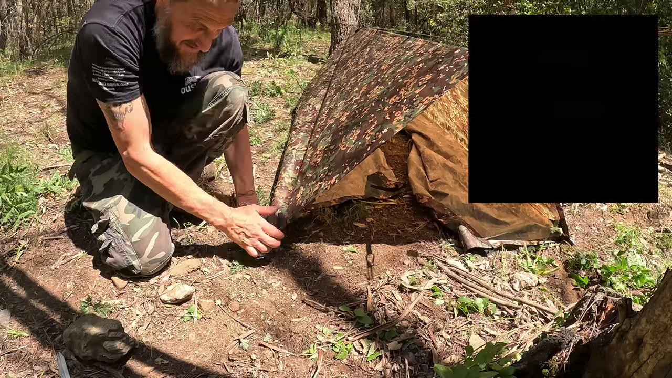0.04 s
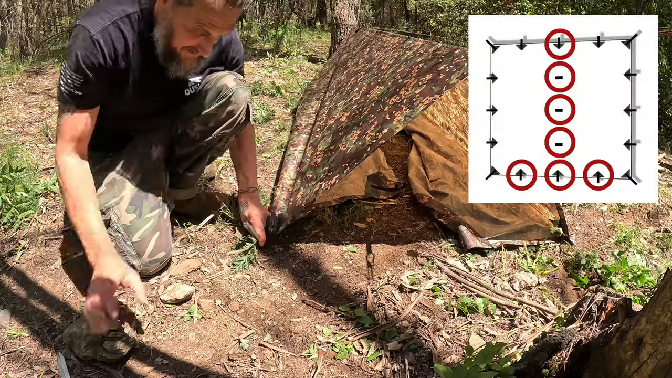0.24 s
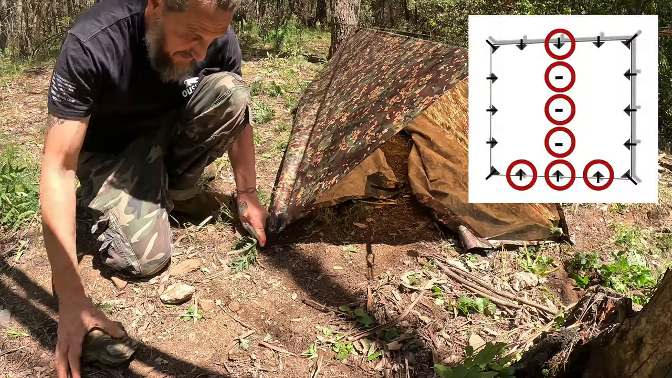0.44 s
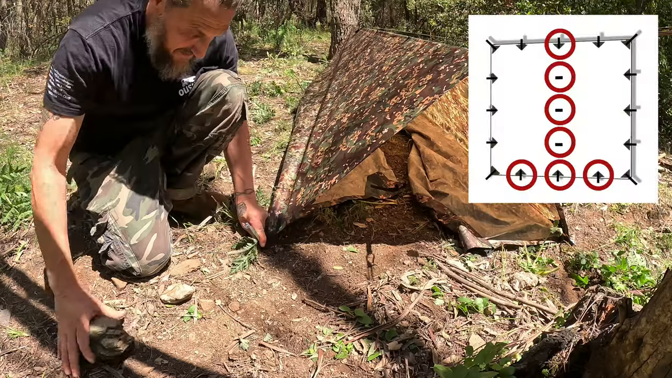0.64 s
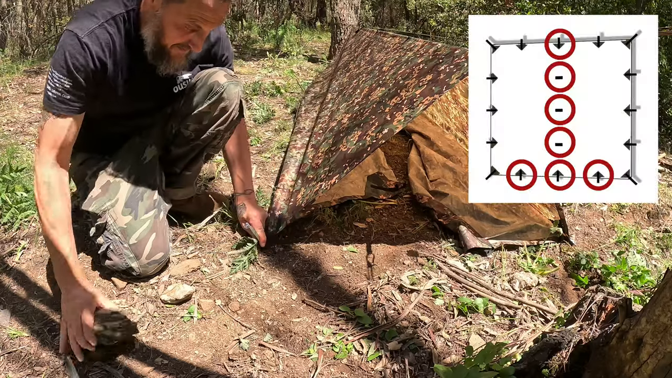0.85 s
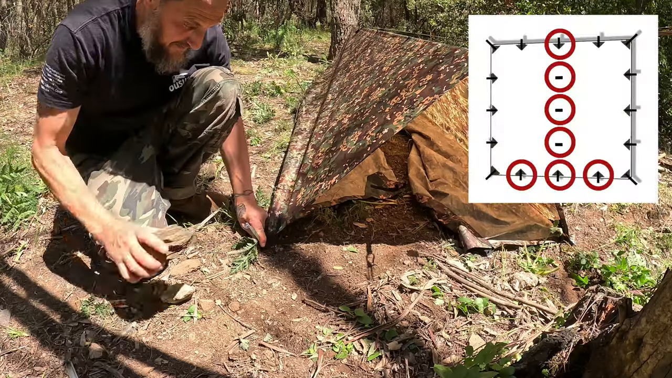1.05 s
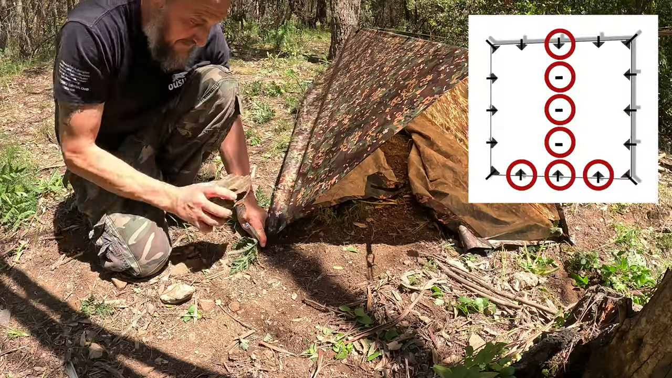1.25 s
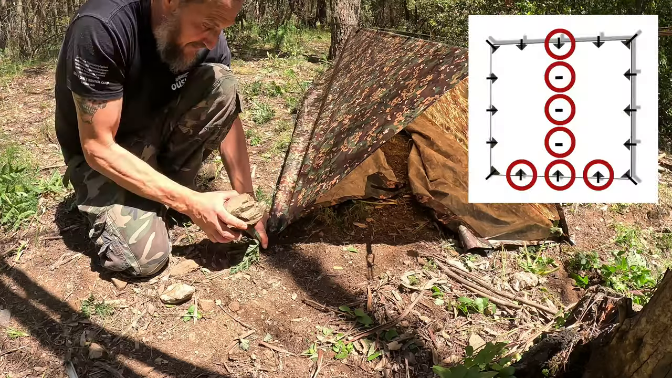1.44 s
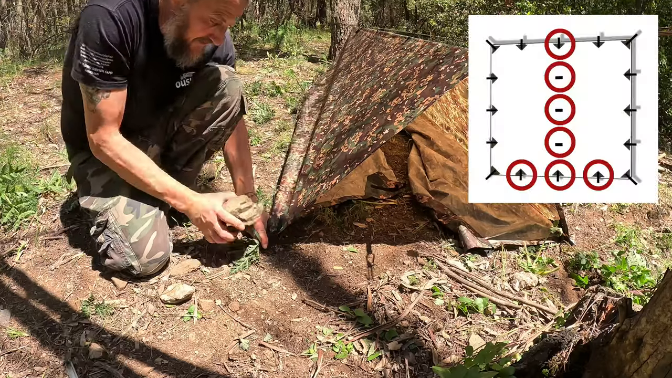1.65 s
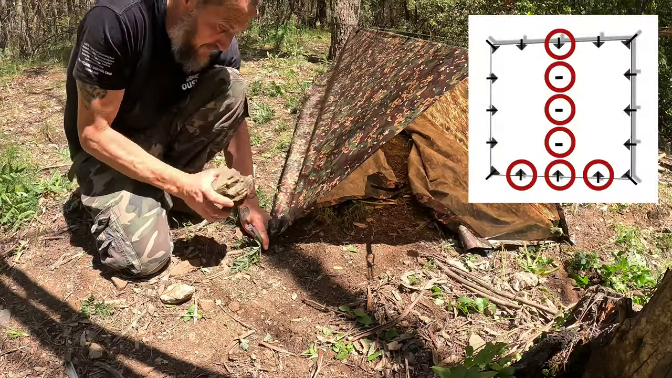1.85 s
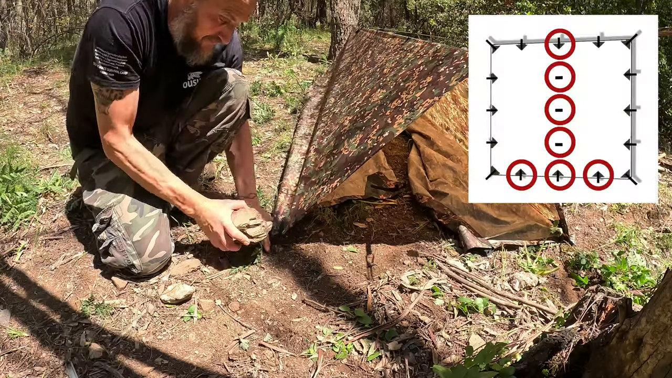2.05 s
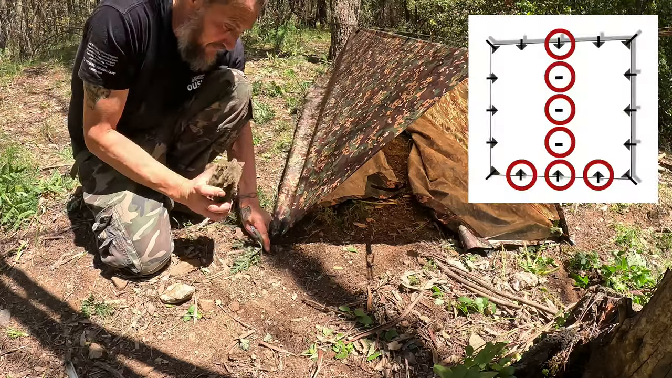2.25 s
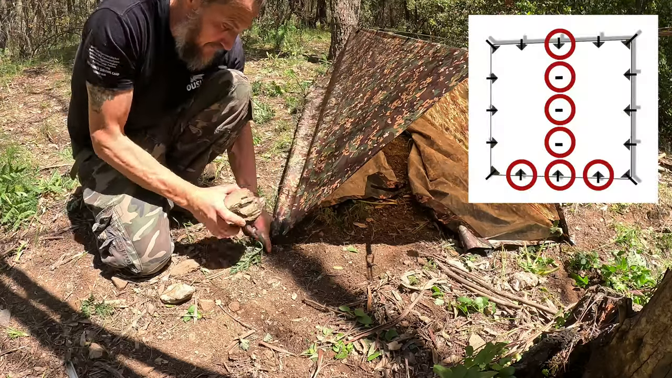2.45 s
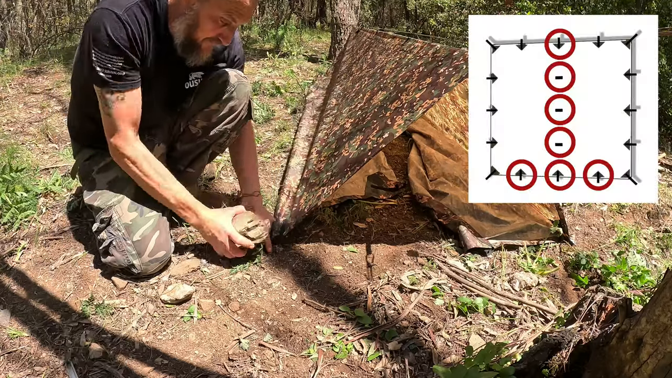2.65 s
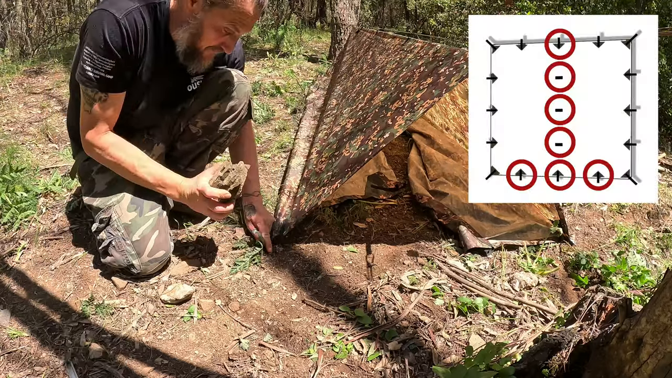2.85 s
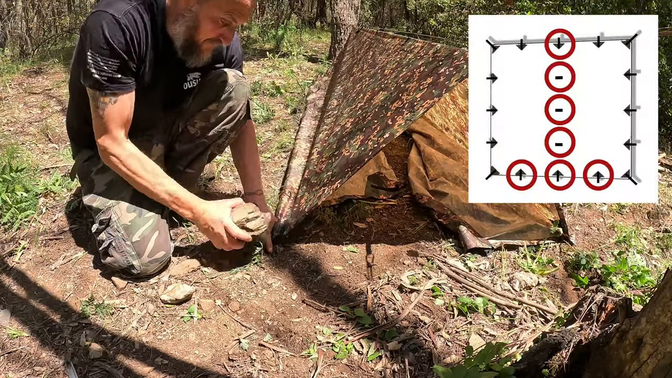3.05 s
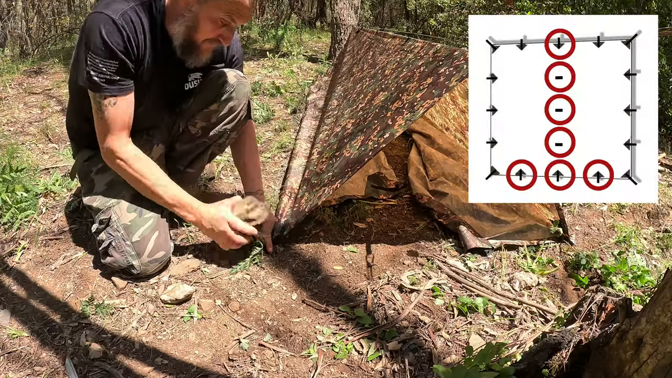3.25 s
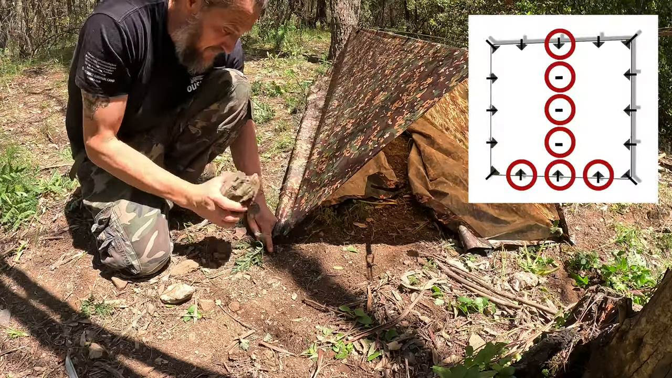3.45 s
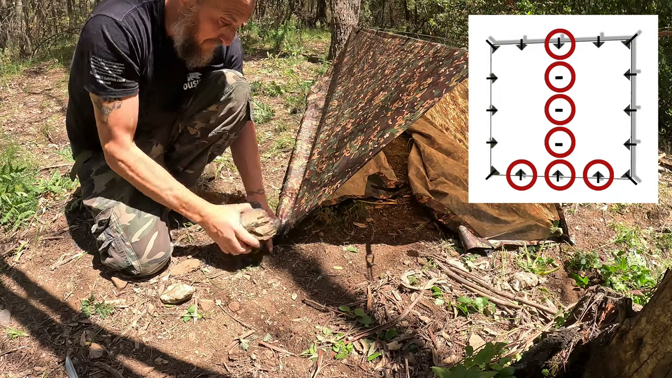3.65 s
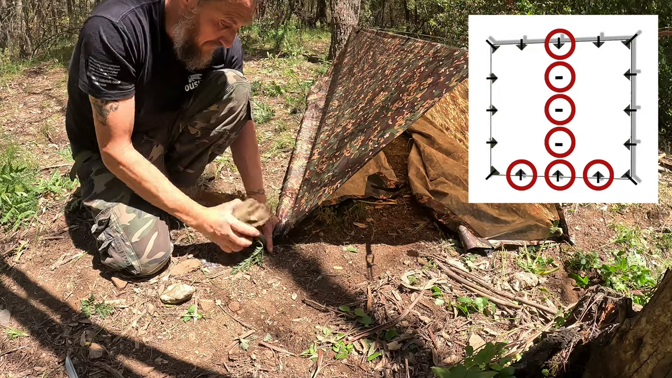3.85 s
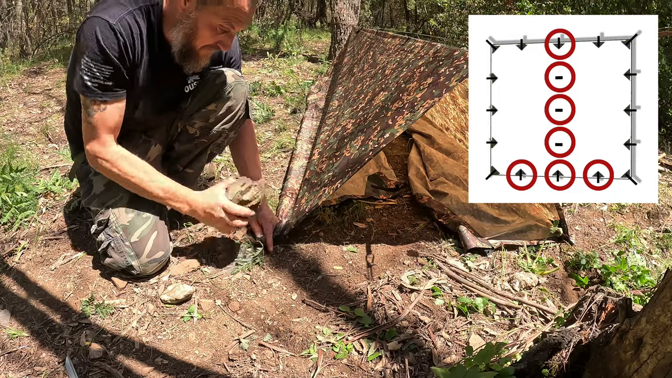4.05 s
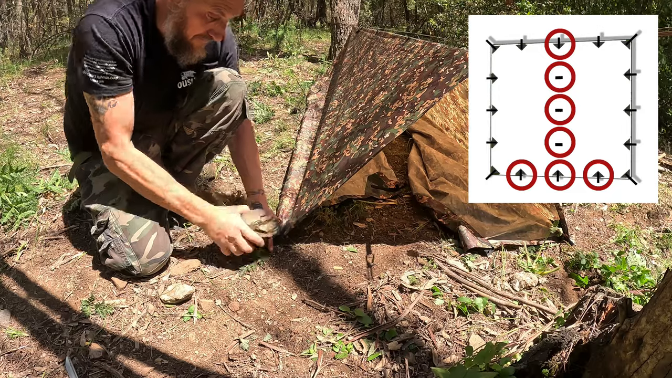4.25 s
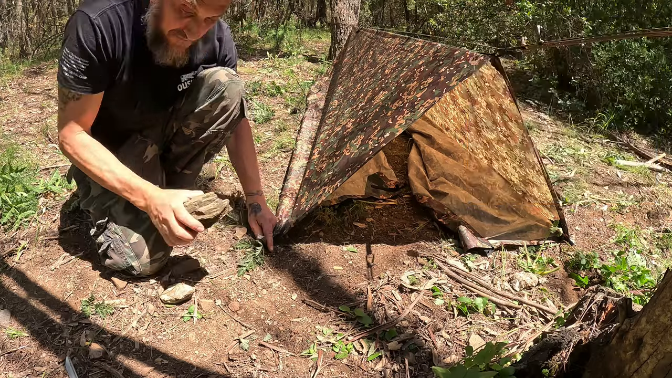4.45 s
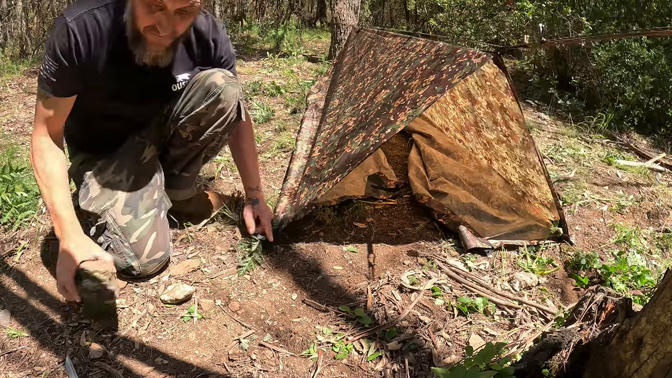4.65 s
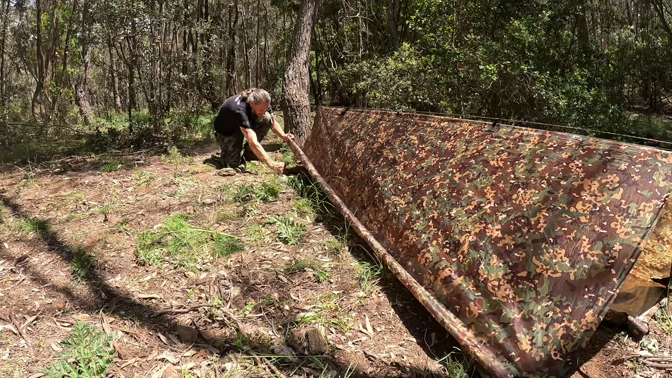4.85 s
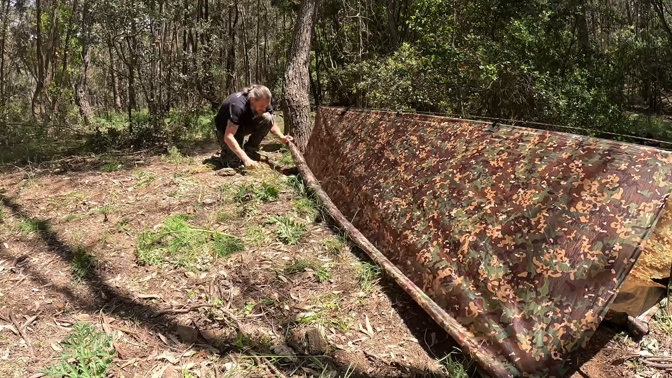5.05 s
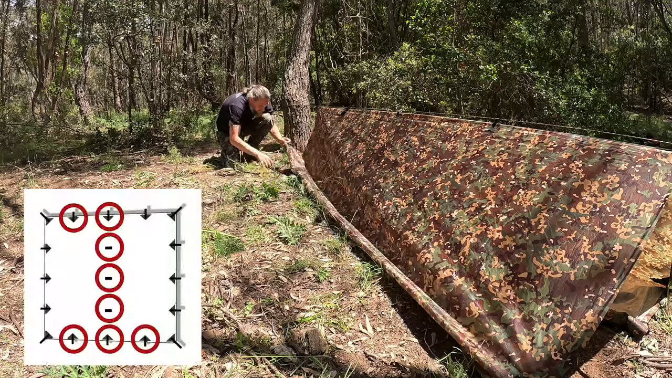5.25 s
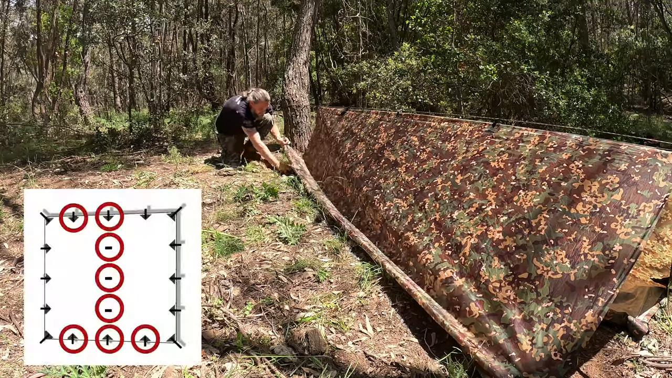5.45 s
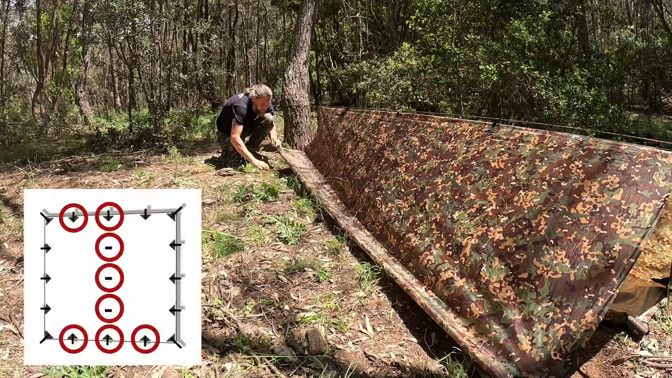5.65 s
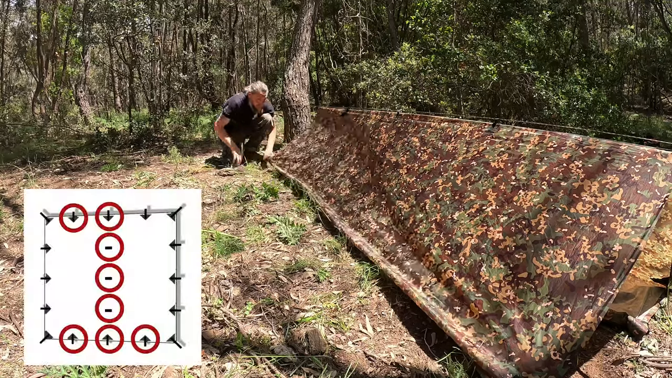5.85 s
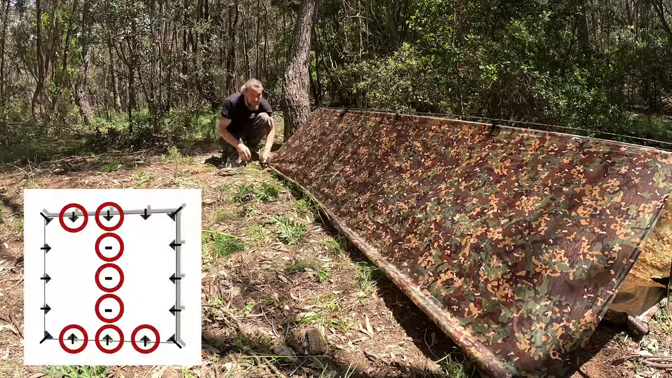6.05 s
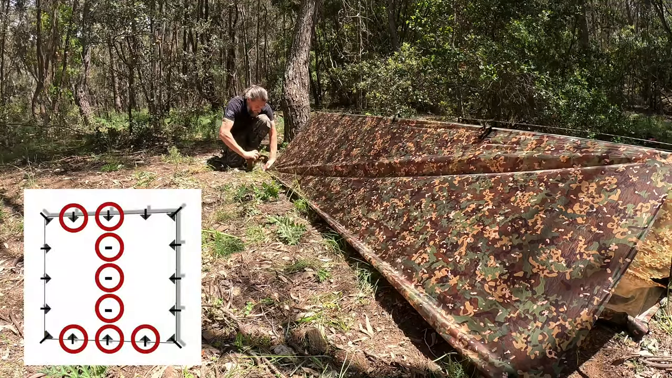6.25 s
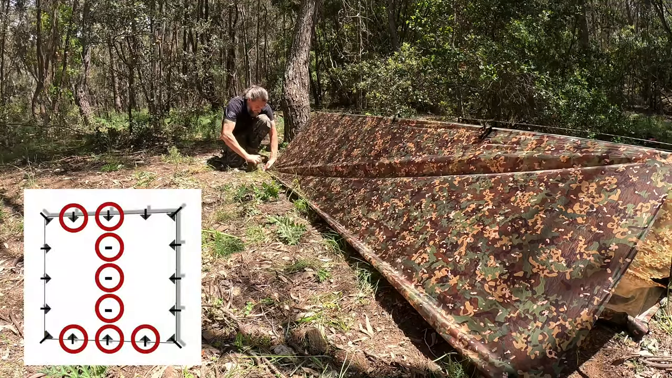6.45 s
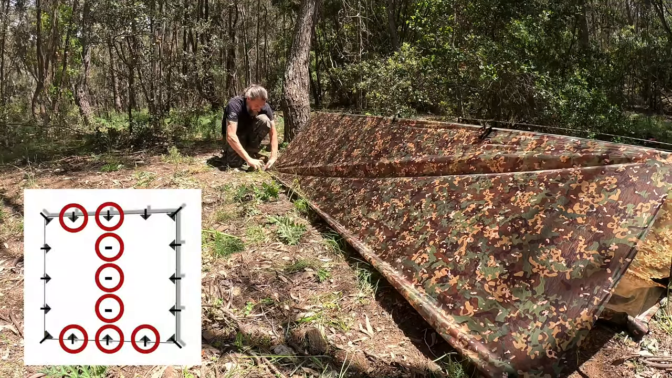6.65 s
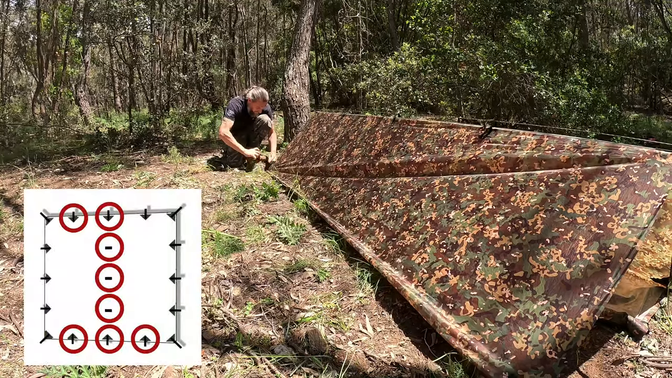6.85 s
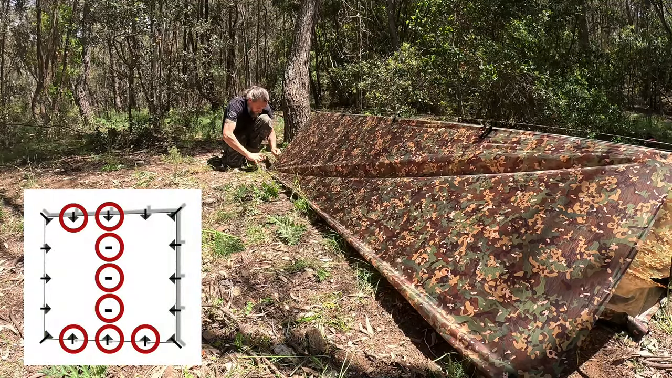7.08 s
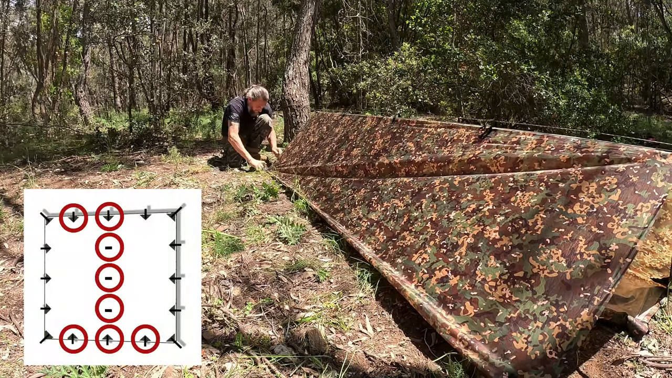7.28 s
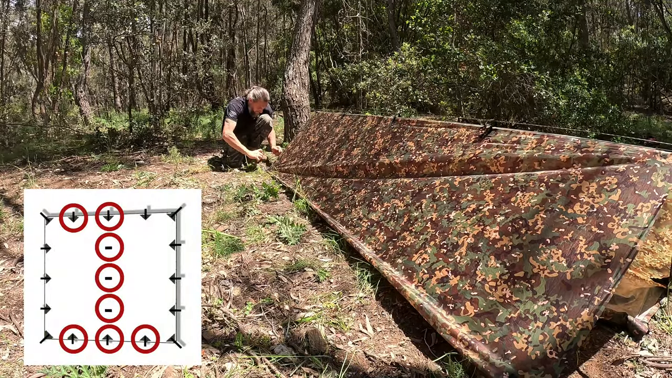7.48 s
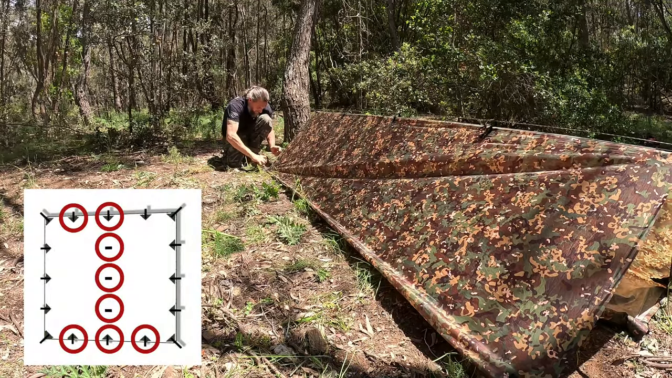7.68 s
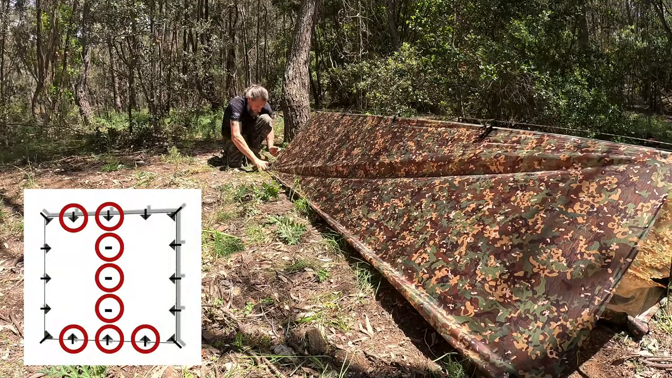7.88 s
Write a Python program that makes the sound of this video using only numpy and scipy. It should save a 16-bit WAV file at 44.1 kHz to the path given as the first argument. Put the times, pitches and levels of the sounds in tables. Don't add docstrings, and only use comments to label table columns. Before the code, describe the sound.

Outdoor mono pickup near the ground: a short bright jingle of metal pegs, a two-note bird song, then evenly spaced stone-on-stake knocks, loud and dry with deep thuds and small rebounds. The hammering stops; fabric and litter rustle and tick faintly while thin bird whistles sound. Then distant, smaller taps resume at the same pace, with woody echo, dull thumps and slight metallic ringing.

```python
import sys
import numpy as np
from scipy import signal
from scipy.io import wavfile

SR = 44100
rng = np.random.default_rng(int(sys.argv[2]) if len(sys.argv) > 2 else 0)


def elevation(decibels):
    levels = np.asarray(decibels, float)
    return 10 ** (levels / 20)


def int16_out(signal):
    q = np.round(np.clip(np.atleast_2d(signal).T, -1, 1) * 32767)
    wavfile.write(sys.argv[1], SR, q.astype(np.int16))


N = 349272

# start_s, crack_peak_db, lower_knock_hz, upper_knock_hz, thump_db
NEAR_BLOWS = [
    (1.355, -23.5, 1260, 2340, -24),
    (1.68, -11, 1820, 2138, -20),
    (2.006, -2.5, 2100, 2360, -21),
    (2.34, -4, 1920, 2215, -17.5),
    (2.66, -4.5, 2090, 2393, -15),
    (2.976, -11, 1860, 2666, -14),
    (3.287, -6.5, 2050, 2600, -15),
    (3.588, -8, 1940, 2740, -14),
    (3.888, -8, 1924, 2120, -13),
    (4.188, -7, 1953, 2244, -15.5),
]
# start_s, crack_peak_db, knock_hz, thump_db, grind_s
FAR_BLOWS = [
    (6.337, -29, 3380, -31.5, 0.0045),
    (6.6457, -34.5, 3580, -30, 0.00056),
    (6.9648, -27.5, 3340, -31.5, 0.00022),
    (7.2774, -20.5, 3520, -28.5, 0.0016),
    (7.58, -23.5, 3490, -27.5, 0.0009),
    (7.8556, -28, 3380, -24.5, 0.0018),
]
# start_s, peak_db, knock_hz
GRAZES = [
    (6.6481, -34, 6200),
    (6.966, -28, 2720),
    (7.2755, -40, 3340),
    (7.579, -38.5, 3540),
]
# pitch_hz, level_db, t60_s
ROCK_MODES = [(676, -13, 0.0068), (924, -7.5, 0.0079), (1463, -6.5, 0.0075), (3800, -9.5, 0.0076),
              (4550, -8.5, 0.0047), (5402, -5, 0.0043), (6200, -14.5, 0.0057), (7480, -10, 0.0037),
              (9000, -13.5, 0.0036), (11500, -19, 0.0033), (14660, -25.5, 0.0036)]
# pitch_hz, level_db, t60_s, arrival_s, polarity
SOIL_WAVES = [(273, 0.5, .035, 0.00361, -0.83), (93, 2, 0.07, 0.00488, 0.66), (74, -21, .16, .01, 1),
              (175, -8, 0.093, .008, 0.83)]
# start_s, level_db
REBOUNDS = [(1.379, -36), (1.7, -35), (1.706, -31.5), (2.036, -25), (2.045, -38), (2.382, -30),
            (2.693, -25), (3.006, -38), (3.017, -33), (3.327, -28), (3.623, -20), (3.922, -23.5),
            (4.203, -28.5), (4.212, -29), (7.005, -44.5), (7.016, -40), (7.325, -37), (7.593, -34),
            (7.868, -41), (7.895, -36.5)]
# start_s, pitch_hz, level_db, t60_s
STAKE_RING = [
    (6.648, 6250, -42, 0.051),
    (6.968, 6230, -52.5, 0.23),
    (7.279, 6290, -48.5, 0.18),
    (7.858, 6250, -55, 0.17),
    (7.858, 3854, -45, 0.095),
]
# start_s, tick_db, ring_db, best_excited_hz
JINGLE_TOUCHES = [(.378, -52, -58, 10500), (.385, -44, -48, 10700), (0.397, -21, -43.5, 4860),
                  (.4, -29, -43, 6000), (.417, -42, -49, 11500), (.422, -44, -44, 8400),
                  (.433, -46, -52, 5500), (.445, -41, -52, 5000), (0.4835, -22, -50, 5000),
                  (0.4879, -25, -35.5, 4970), (0.491, -24.5, -35.5, 8000), (.496, -44, -38, 11000),
                  (0.5209, -29, -41.5, 6080), (0.5423, -39, -54, 7000), (.548, -21, -36, 5900),
                  (0.5518, -37, -38, 5100), (.598, -43.5, -64, 11000), (0.64, -49, -57, 11000),
                  (0.68, -40, -61, 6000), (.691, -43, -64, 8000), (.708, -50, -64.5, 9000),
                  (0.734, -37, -57.5, 6000), (.747, -53, -50.5, 8500), (.772, -56, -61, 6000),
                  (1.008, -54, -74, 9000)]
# pitch_hz, level_db, t60_s
STAKE_MODES = [(2900, -32, 0.12), (3800, 0, 0.067), (4196, -11.5, 0.091), (4780, -11, 0.0426),
               (5700, -11, 0.08), (5930, 5.5, 0.036), (6250, -25, 0.053), (6800, -15, 0.088),
               (7420, -15, 0.12), (8100, -27, 0.052), (8400, -11, 0.1), (9800, -14, 0.1),
               (9870, -11.5, 0.12), (10600, -14, 0.068), (11000, -7, .08), (11800, -26, 0.039),
               (12700, -3, 0.066), (14060, -16, 0.049), (14630, -10, 0.065)]
# peak_s, level_db, swell_s, fade_s
RUSTLE_PULLS = [(.398, -48, 0.016, 0.064), (.482, -51, .02, 0.02), (.688, -57.5, 0.21, 0.03),
                (.746, -58, .03, 0.044), (4.72, -63.5, 0.026, 0.074), (4.87, -66, 0.038, .06),
                (5.0, -70, 0.11, 0.16), (5.13, -61, 0.18, 0.067), (5.2, -74, .03, 0.054),
                (5.33, -77, 0.056, .15), (5.54, -67.5, 0.11, 0.27), (5.65, -72, 0.18, 0.034),
                (5.79, -58.5, 0.094, 0.13), (5.89, -71, .15, 0.019), (6.02, -68.5, 0.1, .2),
                (6.1, -72, 0.106, 0.025), (6.222, -79, 0.17, .006), (6.8, -70.5, 0.32, .16)]
# freq_hz, density_db_per_hz
FABRIC_SPECTRUM = [(880, -40), (1500, -1), (2010, -9.5), (3060, -1), (3520, 2), (7620, -4.5), (12600, 0.5),
                   (15700, -6), (16500, -10)]
# start_s, peak_db
LITTER_SNAPS = [(3.669, -40.5), (4.7544, -46.5), (4.7894, -51), (4.8297, -48), (4.8504, -47), (4.8606, -45),
                (4.8973, -43), (5.1424, -49.5), (5.2044, -56), (5.5024, -50), (5.9044, -52), (6.0075, -45),
                (6.0454, -44.5), (6.11, -44), (6.1429, -55.5), (6.2194, -50)]
# start_s, peak_db
TARP_SNAPS = [(5.0844, -44), (5.1264, -45), (5.5268, -48.5), (5.7144, -52.5), (5.7694, -46), (5.8795, -44),
              (5.9594, -45.5), (5.9774, -50), (5.9892, -43.5), (5.9974, -43), (6.0152, -41), (6.0711, -54)]
# start_s, high_hz, high_db, low_hz, low_db
SONG = [
    (0.889, 4740, -63, 3800, -58),
    (1.39, 4700, -56.5, 3590, -56),
    (1.88, 4650, -53, 3800, -55.5),
]
# start_s, length_s, pitch_hz, level_db
SEEPS = [
    (5.098, 0.19, 7020, -68.5),
    (5.271, 0.26, 6860, -68.5),
    (5.53, 0.162, 6800, -69.5),
    (6.9, .075, 7100, -74.5),
    (7.05, .063, 6850, -71),
    (7.2, 0.068, 6850, -72.5),
]
# start_s, length_s, first_hz, last_hz, level_db
WARBLES = [
    (1.055, 0.13, 2980, 2900, -69),
    (1.866, .065, 3680, 3650, -68),
    (5.278, 0.074, 2600, 2820, -64.5),
    (5.33, 0.0687, 2860, 2500, -70),
    (5.49, 0.077, 3750, 3800, -66.5),
    (6.059, .06, 2468, 2862, -63.5),
    (6.15, 0.04, 3562, 3410, -68),
    (6.51, .03, 7500, 7200, -74),
]
# freq_hz, level_db, early_t60_s, late_db, late_t60_s
TRUNK_ECHOES = [(402, -39.5, 0.1, -15.5, .5), (780, -44, 0.086, -21.5, .6), (1520, -45.5, 0.067, -26, 0.81),
                (2600, -50, 0.04, -13.5, 0.45), (4537, -41, 0.049, -13, 0.3),
                (8000, -40.5, 0.089, -18, 0.54), (13300, -34, .05, -17, 0.24)]
# time_s, wind_db, forest_air_db
AIR_LEVELS = [(0.0, -51, -65.5), (1.3, -60, -64.5), (1.899, -52, -64.5), (2.9, -64.5, -64),
              (4.2, -61.5, -66), (4.6, -53.5, -61), (4.85, -75, -67), (6.2, -66, -66), (6.26, -61, -69.5),
              (7.28, -73, -70), (7.92, -67, -69)]
# freq_hz, density_db_per_hz
WOODS_SPECTRUM = [(35, -31.5), (60, -4), (108, -8), (264, -18.5), (366, -16.5), (464, -16), (815, -12.5),
                  (1190, -22.5), (1300, -21.5), (4750, -29.5), (7420, -31.5), (15400, -38.5), (16500, -57)]


def rms_one(x):
    return x / np.sqrt(np.mean(x ** 2) + 1e-20)


def band(x, low_hz, high_hz):
    edges_hz = [low_hz, min(high_hz, 0.45 * SR)]
    return signal.sosfilt(signal.butter(2, edges_hz, "band", fs=SR, output="sos"), x)


def drift(rate_hz, size=N):
    r = np.exp(-2 * np.pi * rate_hz * 8 / SR)
    noise = rng.standard_normal(size // 8 + 4002)
    slow = signal.lfilter([1], [1, -2 * r, r * r], noise)[4000:]
    return np.interp(np.arange(size) / 8, np.arange(len(slow)), rms_one(slow))


def add(out, start_s, sound):
    i = round(start_s * SR)
    out[i:i + len(sound)] += sound[:N - i]


def mode(pitch_hz, t60_s):
    t = np.arange(int(t60_s * SR) + 2) / SR
    return np.sin(2 * np.pi * pitch_hz * t) * elevation(-60 * t / t60_s)


def soften(x, corner_hz):
    r = np.exp(-2 * np.pi * corner_hz / SR)
    return signal.lfilter([(1 - r) ** 2], [1, -2 * r, r * r], x)


def coloured(spectrum, patchy_db, grain=1):
    freq_hz, density_db = np.transpose(spectrum)
    white = rng.standard_normal((2, N)) * grain
    together = drift(6.3)
    edges_hz = freq_hz[0] * 2 ** np.arange(0, np.log2(16800 / freq_hz[0]) + 0.5, 0.5)
    out = 0
    for k, (low_hz, high_hz) in enumerate(zip(edges_hz, edges_hz[1:])):
        gain_db = np.interp(np.log(low_hz * high_hz) / 2, np.log(freq_hz), density_db)
        flicker_db = patchy_db * (0.49 * together + drift(14.0))
        out = out + elevation(gain_db + flicker_db) * band(white[k % 2], low_hz, high_hz)
    return rms_one(out)


def crack(knocks_hz, bright_db, grind_s, grit_db):
    t = np.arange(1800) / SR
    chance = rng.standard_normal((2, len(t)))
    contacts = chance[0] ** 3 * 0.31 * np.exp(-t / grind_s) * (t < 3 * grind_s)
    contacts[0] = 1
    modes = [(hz, 0, 0.006) for hz in knocks_hz]
    modes += [(hz, db + bright_db, t60_s) for hz, db, t60_s in ROCK_MODES]
    body = np.zeros(len(t))
    for (hz, db, t60_s), (tune, force) in zip(modes, rng.standard_normal((len(modes), 2))):
        ringing = mode(hz * (1 + 0.015 * tune), t60_s)
        body[:len(ringing)] += elevation(db + 1.5 * force) * ringing
    contact_s = 0.00032
    body *= 1 - np.exp(-(t / contact_s) ** 2)
    out = np.convolve(contacts, body)[:len(t)]
    grit = band(chance[1], 1200, 14000) * np.exp(-t / (0.0012 + grind_s))
    return out / np.abs(out).max() + elevation(grit_db) * grit


def near_cracks():
    out = np.zeros(N)
    for start_s, peak_db, lower_hz, upper_hz, _ in NEAR_BLOWS:
        bright_db = -2 - 0.16 * peak_db
        sound = crack([lower_hz, upper_hz], bright_db, grind_s=2e-5, grit_db=bright_db - 18.5)
        add(out, start_s + 0.000987, elevation(peak_db + 0.5) * sound)
    return out


def far_cracks():
    out = np.zeros(N)
    body_hz = 2100
    for start_s, peak_db, knock_hz, _, grind_s in FAR_BLOWS:
        sound = crack([knock_hz, body_hz], 2.4, max(grind_s, 1e-4), grit_db=-8)
        add(out, start_s, elevation(peak_db) * sound)
    for start_s, peak_db, knock_hz in GRAZES:
        add(out, start_s, elevation(peak_db) * crack([knock_hz], 2.6, grind_s=0.0017, grit_db=1.5))
    return out


def thump(out, start_s, level_db, rumble_s, soft_hz):
    for (hz, db, t60_s, arrival_s, polarity), tune in zip(SOIL_WAVES, rng.standard_normal(len(SOIL_WAVES))):
        wave = soften(mode(hz * (1 + 0.03 * tune), t60_s), soft_hz)
        add(out, start_s + arrival_s, polarity * elevation(level_db + db) * wave)
    t = np.arange(SR // 5) / SR
    rumble = band(rng.standard_normal(len(t)) * np.exp(-t / rumble_s), 58, 340)
    add(out, start_s + 0.012, elevation(level_db - 2.5) * rumble)


def ground_blows():
    out = np.zeros(N)
    for start_s, _, _, _, thump_db in NEAR_BLOWS:
        thump(out, start_s, thump_db, rumble_s=0.019, soft_hz=567)
    for start_s, _, _, thump_db, _ in FAR_BLOWS:
        thump(out, start_s - 0.002, thump_db, rumble_s=0.035, soft_hz=430)
    for start_s, level_db in REBOUNDS:
        add(out, start_s, -elevation(level_db + 2.5) * soften(mode(233, 0.029), 360))
    out = signal.sosfilt(signal.butter(2, 56, "high", fs=SR, output="sos"), out)
    for start_s, hz, level_db, t60_s in STAKE_RING:
        for tune in rng.standard_normal(5) * 0.012:
            add(out, start_s, elevation(level_db - 6.5) * mode(hz * (1 + tune), t60_s))
    return out


def jingle():
    out = np.zeros(N)
    t = np.arange(600) / SR
    for start_s, tick_db, ring_db, best_hz in JINGLE_TOUCHES:
        chance = rng.standard_normal((len(STAKE_MODES), 2)) * [4, 0.004]
        for (hz, db, t60_s), (force_db, tune) in zip(STAKE_MODES, chance):
            level_db = ring_db + db + force_db - 9 * np.log2(hz / best_hz) ** 2
            add(out, start_s, elevation(level_db) * mode(hz * (1 + tune), t60_s))
        burst = rng.standard_normal(len(t)) * np.exp(-t / 0.0021)
        add(out, start_s, elevation(tick_db) * band(burst, best_hz / 1.2, best_hz * 1.6))
    return out


def rustle():
    t = np.arange(N) / SR
    level = np.zeros(N)
    for peak_s, level_db, swell_s, fade_s in RUSTLE_PULLS:
        before = (peak_s - t) / max(swell_s, 0.003)
        after = (t - peak_s) / max(fade_s, 0.003)
        level += elevation(level_db - 15.5 * np.where(t < peak_s, before, after))
    grain = elevation(1.4 * drift(150))
    out = level * elevation(2.0) * coloured(FABRIC_SPECTRUM, patchy_db=1.54, grain=grain)
    for snaps, centre_hz in (LITTER_SNAPS, 5200), (TARP_SNAPS, 12800):
        for start_s, peak_db in snaps:
            burst = rng.standard_normal(300) * np.exp(-t[:300] / 0.0015)
            add(out, start_s, elevation(peak_db - 1.5) * band(burst, centre_hz / 2.0, centre_hz * 1.43))
    return out


def whistle(length_s, first_hz, last_hz, level_db, rough_db, bend=2.7):
    u = np.linspace(0, 1, int(length_s * SR))
    glide_hz = last_hz + (first_hz - last_hz) * (1 - u) ** bend
    pitch_hz = glide_hz * (1 + 0.0022 * rough_db * drift(120, len(u)))
    flutter_db = 0.64 * rough_db * drift(70.5, len(u))
    swell = np.sin(np.pi * u ** 0.7) ** 0.5 * elevation(level_db - 2.5 + flutter_db)
    return swell * np.sin(2 * np.pi * np.cumsum(pitch_hz) / SR)


def two_note_song():
    out = np.zeros(N)
    for start_s, high_hz, high_db, low_hz, low_db in SONG:
        slide = 1.045 + 0.017 * max(high_db + 56, 0)
        add(out, start_s, whistle(0.11, high_hz * slide, high_hz, high_db, rough_db=4.5))
        low_s = start_s + 0.205
        add(out, low_s - 0.025, whistle(0.044, 5900, 5900, low_db - 16, rough_db=5.0))
        add(out, low_s, whistle(0.11, low_hz * 1.045, low_hz, low_db, rough_db=8.0))
    return out


def seeps():
    out = np.zeros(N)
    for start_s, length_s, hz, level_db in SEEPS:
        add(out, start_s, whistle(length_s, hz * 1.012, hz, level_db, rough_db=5.0))
    return out


def warbler():
    out = np.zeros(N)
    for start_s, length_s, first_hz, last_hz, level_db in WARBLES:
        add(out, start_s, whistle(length_s, first_hz, last_hz, level_db + 2, rough_db=1.3, bend=1.5))
    return out


def forest(x):
    t = np.arange(SR // 2) / SR
    echo = 0
    for hz, level_db, early_t60_s, late_db, late_t60_s in TRUNK_ECHOES:
        early = elevation(level_db - 60 * t / early_t60_s)
        late = elevation(level_db + late_db - 60 * t / late_t60_s)
        echo = echo + (early + late) * band(rng.standard_normal(len(t)), hz / 1.39, hz * 1.424)
    return signal.fftconvolve(x, echo * np.minimum(t / 0.0037, 1))[:N]


def canopy(song):
    t = np.arange(SR // 2) / SR
    echo = rng.standard_normal(len(t)) * elevation(-31.5 - 60 * t / 0.56)
    return signal.fftconvolve(song, echo)[:N]


def background():
    time_s, wind_db, air_db = np.transpose(AIR_LEVELS)
    t = np.arange(N) / SR
    wind = rms_one(band(rng.standard_normal(N), 12, 36) * elevation(5.2 * drift(4)))
    leaves = coloured(WOODS_SPECTRUM, patchy_db=1.3)
    wind_gain = elevation(np.interp(t, time_s, wind_db) + 3.0)
    leaves_gain = elevation(np.interp(t, time_s, air_db) + 4.5)
    return wind_gain * wind + leaves_gain * leaves


def scene():
    near = near_cracks() + jingle()
    far = far_cracks()
    song = two_note_song() + seeps()
    warble = warbler()
    far_knock = band(far, 1560, 2730)
    echoes = forest(near + elevation(6.0) * far + elevation(7.5) * far_knock)
    echoes = echoes + canopy(song + elevation(-10) * warble)
    mix = near + far + ground_blows() + song + warble + echoes + rustle() + background()
    return mix[None]


def low_pass(x):
    return signal.sosfilt(signal.butter(12, 17020, fs=SR, output="sos"), x)


def record(dry):
    x = signal.sosfilt(signal.butter(1, 15, "high", fs=SR, output="sos"), dry)
    x = signal.sosfilt(signal.cheby2(8, 50, 17000, fs=SR, output="sos"), x)
    return low_pass(x)


dry = scene()
out = record(dry)
int16_out(out)
```